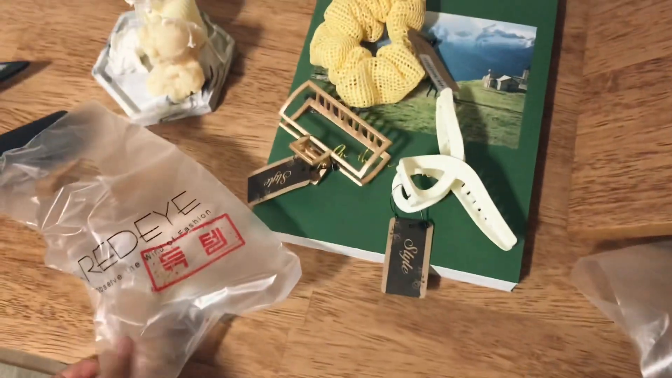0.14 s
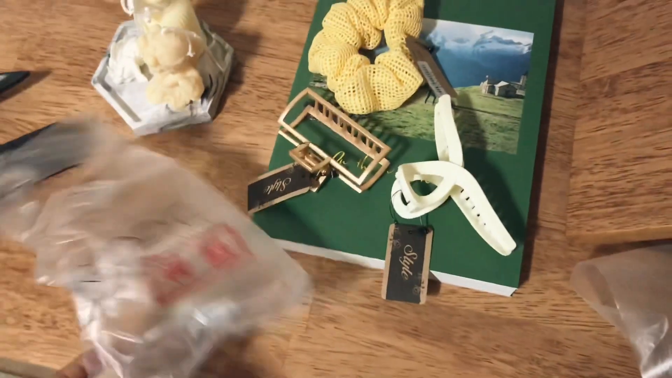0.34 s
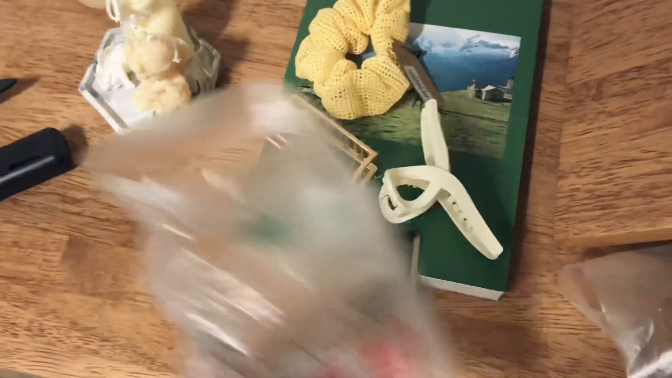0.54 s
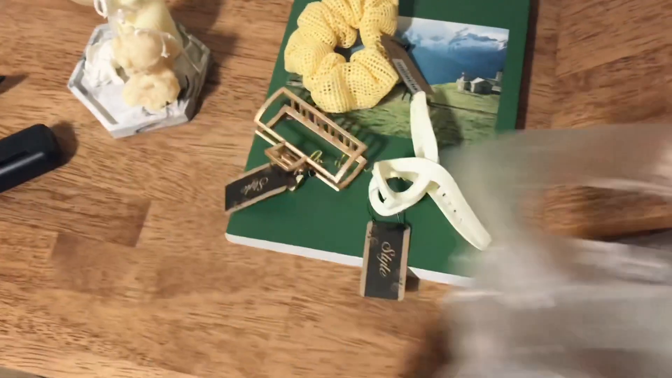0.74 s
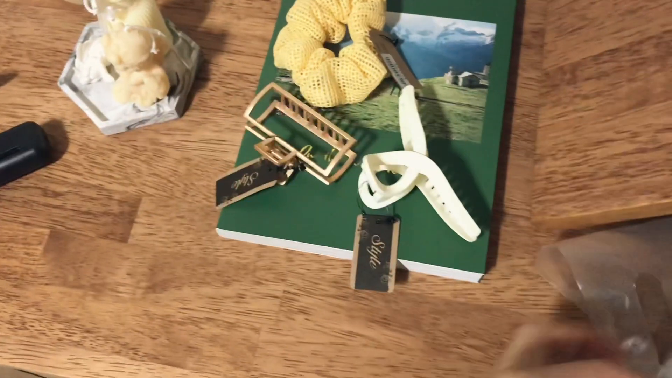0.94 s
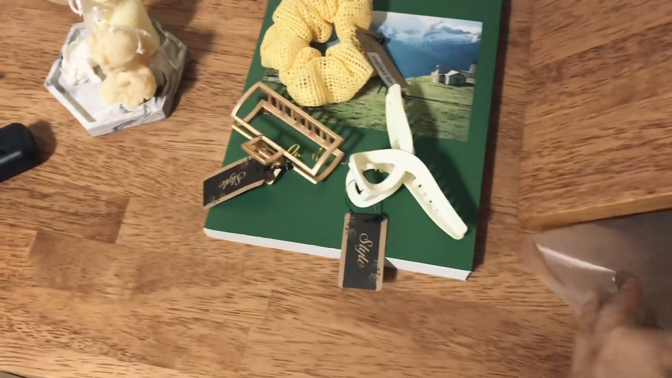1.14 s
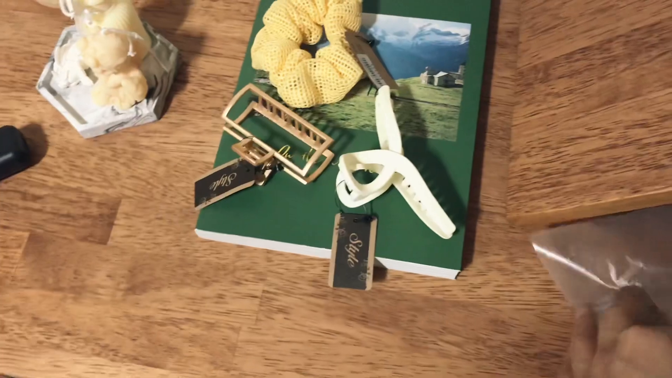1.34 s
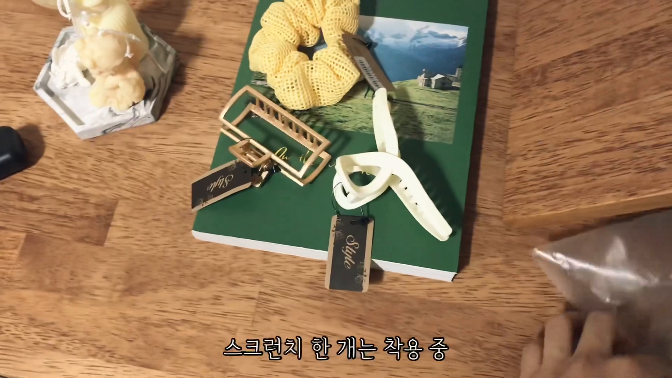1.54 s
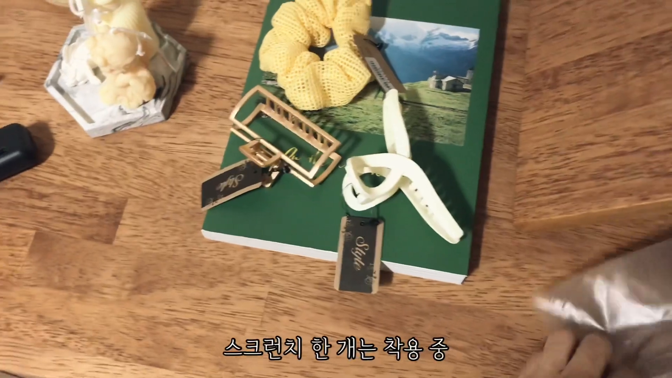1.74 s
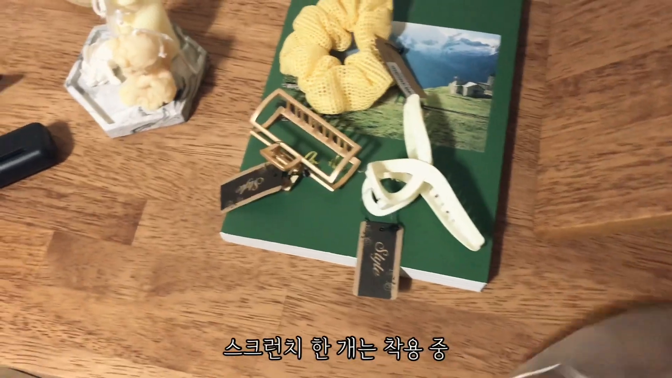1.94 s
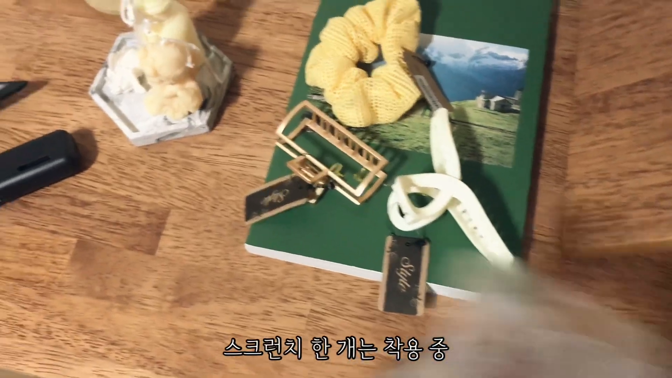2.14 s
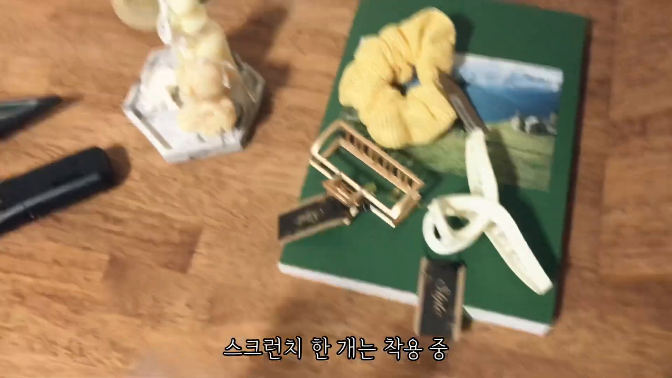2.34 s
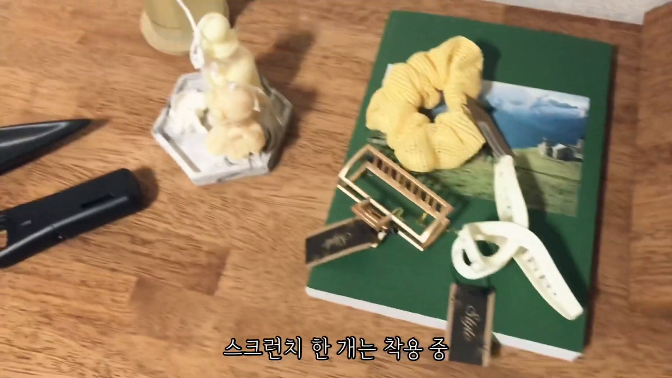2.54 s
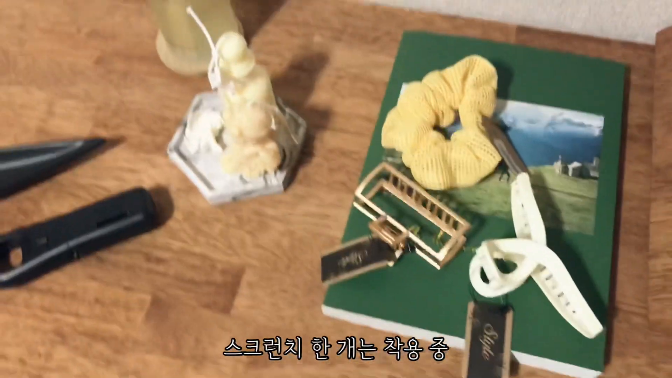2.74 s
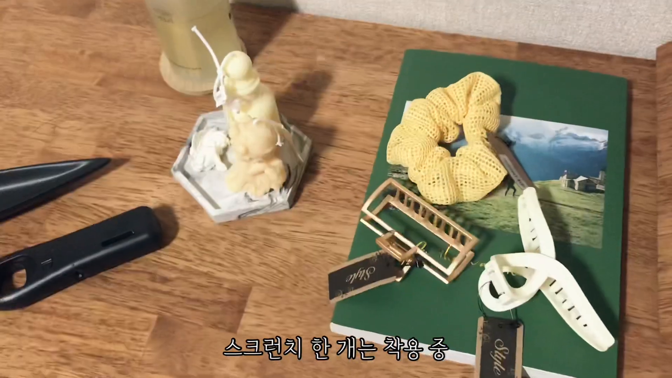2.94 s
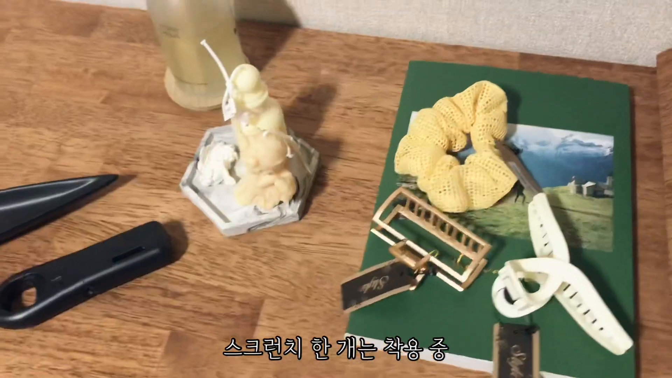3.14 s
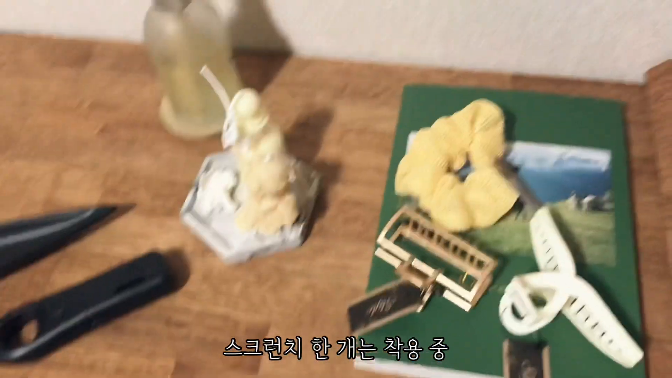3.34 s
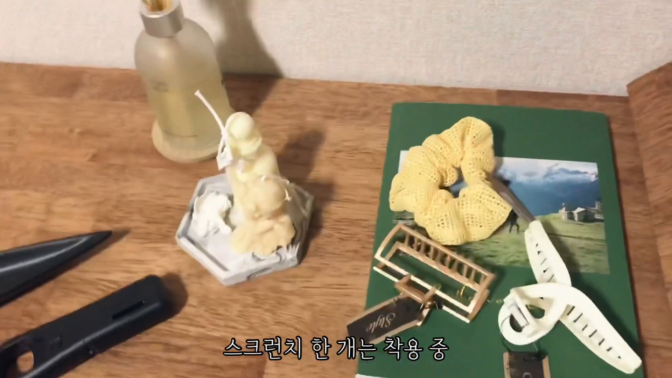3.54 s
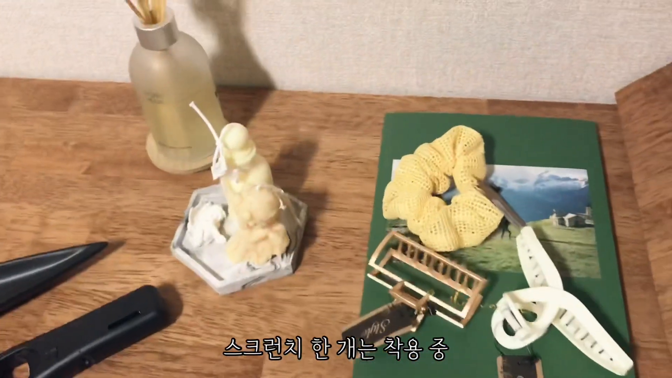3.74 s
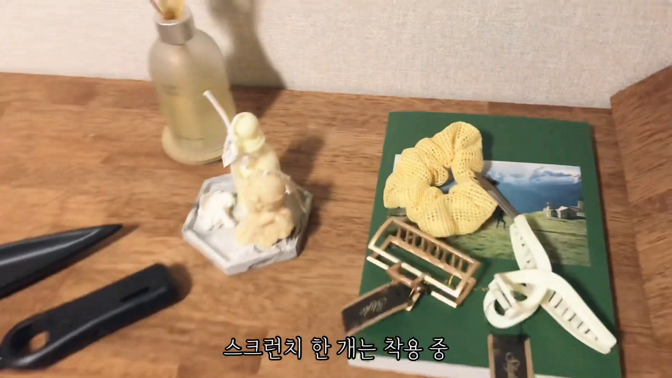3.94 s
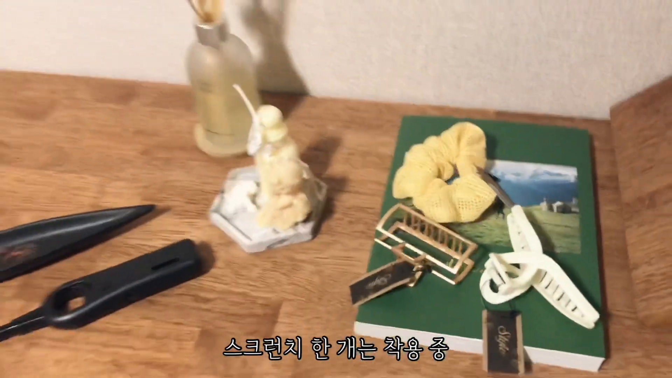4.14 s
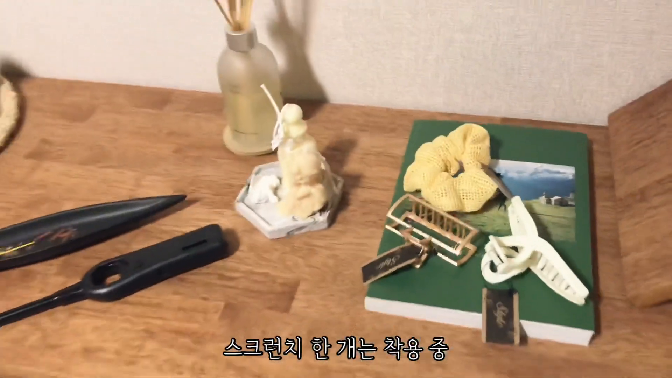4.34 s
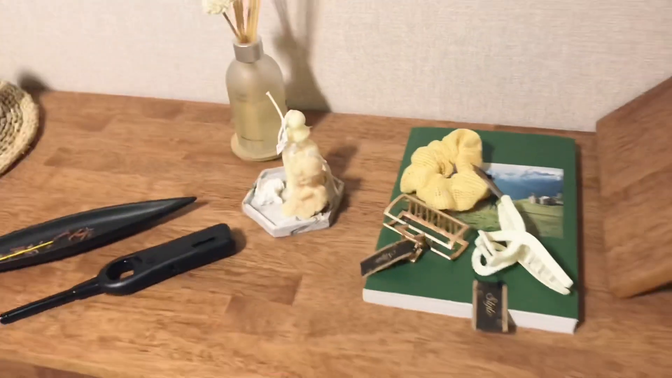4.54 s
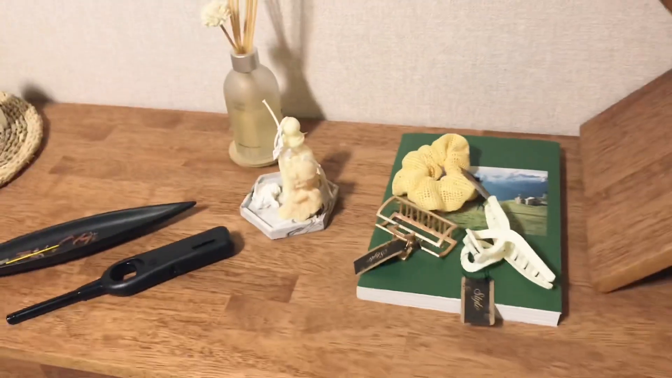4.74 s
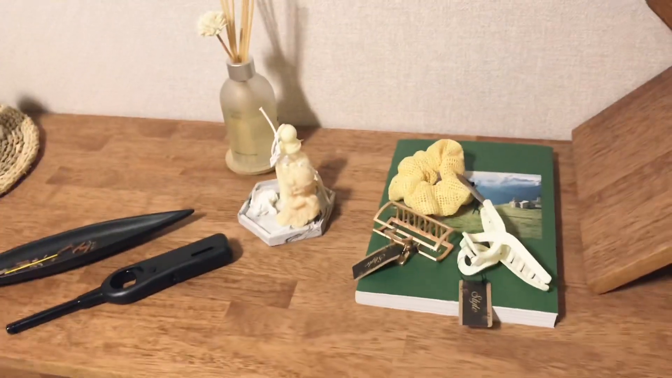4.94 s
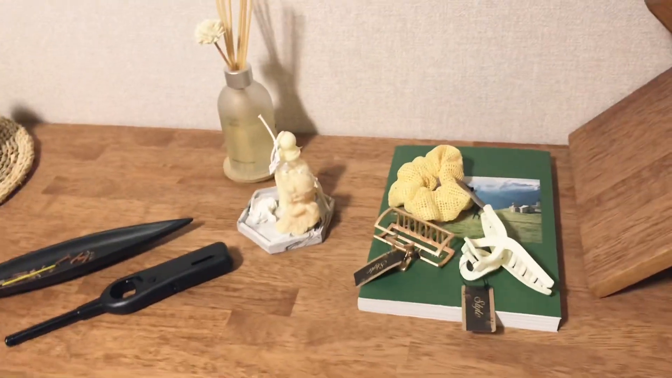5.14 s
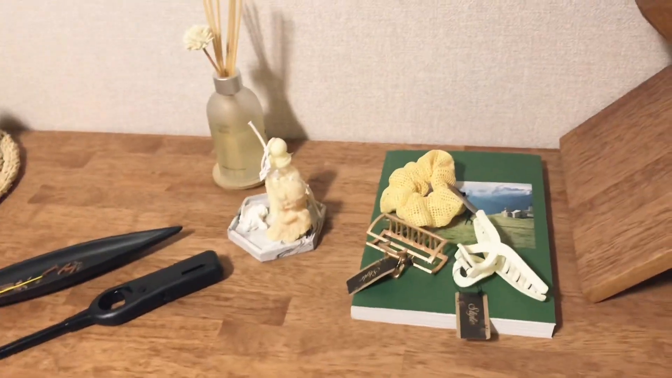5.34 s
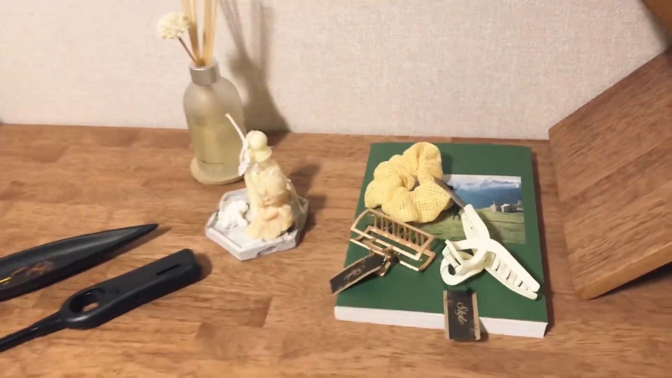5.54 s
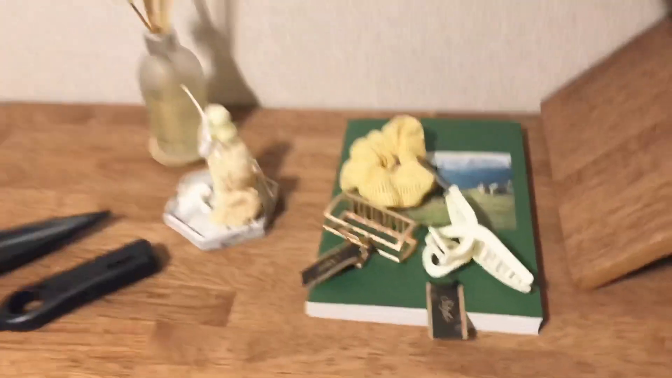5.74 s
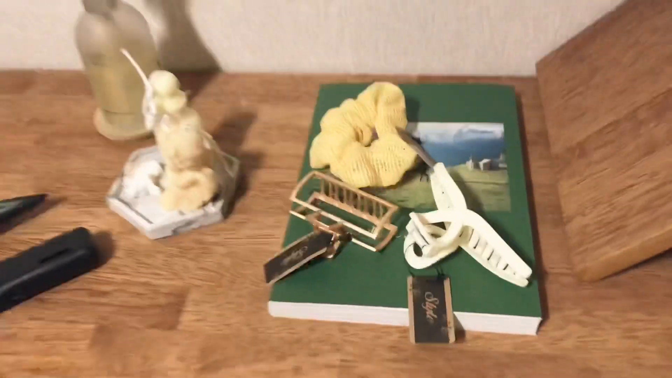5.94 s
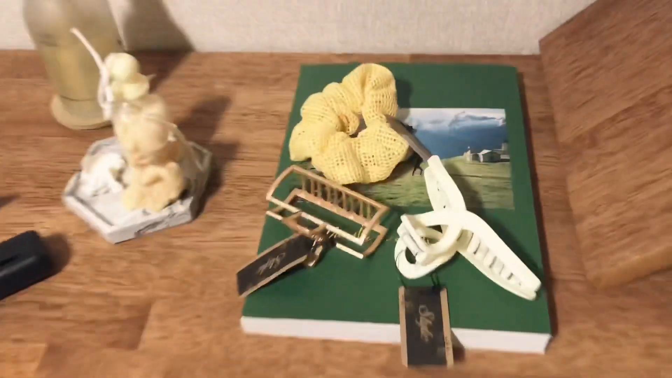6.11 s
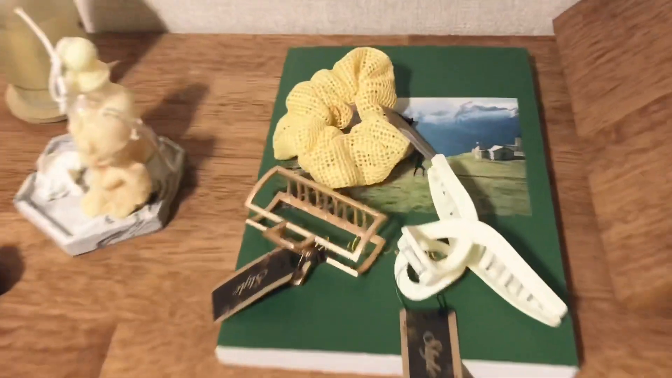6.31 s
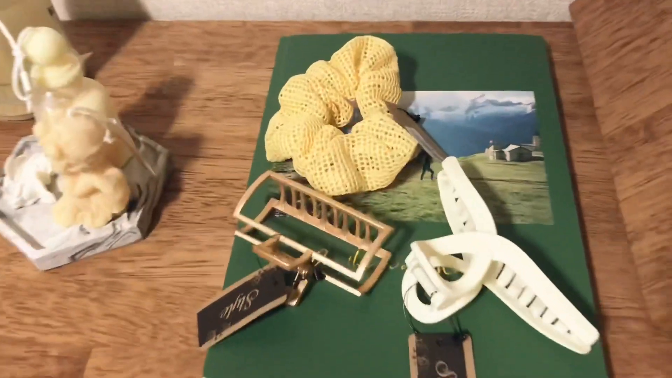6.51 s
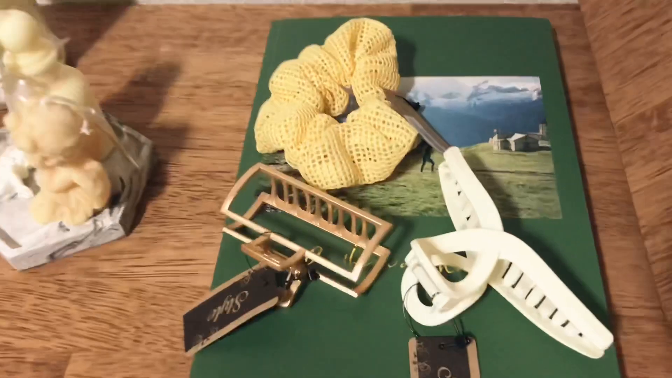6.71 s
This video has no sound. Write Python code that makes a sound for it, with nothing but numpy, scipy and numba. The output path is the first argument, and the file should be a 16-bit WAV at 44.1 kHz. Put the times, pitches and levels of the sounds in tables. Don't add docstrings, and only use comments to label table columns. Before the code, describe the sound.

Close to a hand-held phone at a wooden desk, thin plastic bags crinkle lightly with sharp snaps, then are gathered and crushed in a dense, bright, crackling burst with soft low thuds. The rustle drops after about three seconds into sparse crackles and small slides, leaving a small quiet room with faint hum, hiss and a distant insect-like high band.

```python
import sys
import numpy as np
from scipy import signal
from scipy.fft import rfft, irfft, next_fast_len
from scipy.io import wavfile
from scipy.ndimage import uniform_filter1d
from numba import njit

SR = 44100
rng = np.random.default_rng(int(sys.argv[2]) if len(sys.argv) > 2 else 0)


def int16_out(signal):
    q = np.round(np.clip(np.atleast_2d(signal).T, -1, 1) * 32767)
    wavfile.write(sys.argv[1], SR, q.astype(np.int16))


def to_linear_factor(level_db):
    exponent = np.asarray(level_db, float) / 20
    return 10 ** exponent


N = 298557

PANEL_EDGES_HZ = (300, 1800, 7000, 16500)


def level(x, db):
    return x * to_linear_factor(db) / np.sqrt(np.mean(x ** 2))


def shape_db(points, hz):
    f, db = np.transpose(points)
    return np.interp(np.log(np.maximum(hz, 1)), np.log(f), db)


def coloured(points):
    size = next_fast_len(N)
    gain = to_linear_factor(shape_db(points, np.fft.rfftfreq(size, 1 / SR)))
    spectrum = rfft(rng.standard_normal(size)) * gain
    return level(irfft(spectrum, size)[:N], 0)


def walk(rate_hz):
    hold = int(SR / rate_hz)
    steps = np.repeat(rng.standard_normal(N // hold + 1), hold)
    return 2.0 * uniform_filter1d(uniform_filter1d(steps, hold), hold)[:N]


@njit
def ring(start_s, hz, t60_s, gain, turn):
    out = np.zeros(N)
    for k in range(len(start_s)):
        step = np.exp(2j * np.pi * hz[k] / SR - np.log(1000.) / (t60_s[k] * SR))
        z = gain[k] * np.exp(2j * np.pi * turn[k])
        first = int(start_s[k] * SR)
        for i in range(first, min(N, first + int(t60_s[k] * SR))):
            out[i] += z.imag
            z *= step
    return out


def panels(s, db, lo_hz, hi_hz, run_s, cycles, scatter_db, count):
    c = rng.random((len(s), count, 5))
    place = (np.arange(count) + c[..., 0]) / count
    hz = lo_hz[:, None] * (hi_hz / lo_hz)[:, None] ** place
    late = c[..., 1] ** 1.7
    turn = .5 * (c[..., 4] > .5) + .08 * c[..., 2]
    t60_s = np.clip(cycles * (.5 + c[..., 2]) / hz, .0004, .03)
    stiff_db = 7 * (place - .5)
    gain = to_linear_factor(db[:, None] - 12.6 * late + stiff_db + scatter_db * (c[..., 3] - 1.0))
    start_s = s[:, None] + run_s[:, None] * late / 2
    return ring(start_s.ravel(), hz.ravel(), t60_s.ravel(), gain.ravel(), turn.ravel())


def quiet():
    # freq_hz, level_db_per_hz
    room_spectrum = [(28, -30.5), (42, 0.5), (58, 3), (90, -13.5), (137, -8.5), (250, -14), (500, -18),
                     (1000, -23), (2000, -29.5), (4000, -28.5), (6500, -34.5), (10300, -35.5), (12500, -35),
                     (16000, -42)]
    # centre_hz, width_hz, level_db
    insect_bands = [
        (4650, 230, -75),
        (4820, 230, -75.5),
        (4960, 280, -75.5),
    ]
    out = to_linear_factor(-64 + 0.69 * walk(1.94)) * coloured(room_spectrum)
    for hz, width_hz, db in insect_bands:
        b, a = signal.iirpeak(hz, hz / width_hz, fs=SR)
        band = signal.lfilter(b, a, signal.lfilter(b, a, rng.standard_normal(N)))
        out = out + level(band, db) * to_linear_factor(0.7 * walk(9.8))
    return out


def hands():
    # time_s, grip_rustle_db, tension_db
    grip_points = [(0, -81, -11), (.3, -67, 5.5), (.8, -70, 3.5), (.95, -59, -1.5), (1.22, -56.5, -1.5),
                   (1.33, -46.5, -4), (1.75, -45, -4), (2.1, -48, -3), (2.45, -46, 1), (2.6, -50.5, -0.5),
                   (3.08, -46, -1), (3.2, -59, -2), (3.45, -74.5, 4.5), (3.75, -70.5, -10),
                   (4.0, -61, -1.5), (4.45, -63.5, -13), (4.55, -75.5, -3), (6.77, -86, 0)]
    # start_s, hold_s, above_grip_db, slackening_db
    squeezes = [(0.156, 0.071, 6.5, 5), (0.57, 0.23, 3.5, 6.5), (0.94, 0.054, 4, 0),
                (1.138, 0.041, 5.5, -1), (1.323, 0.078, 3, -1), (1.49, 0.17, 3, -2),
                (1.88, 0.095, 4.5, -1.5), (2.112, 0.034, 3, 2), (2.175, 0.17, 8.5, 0.5),
                (2.38, 0.052, 5.5, -1.5), (2.493, 0.049, 6.5, -0.5), (2.65, 0.052, -1.5, 2),
                (2.832, 0.16, 1.5, -1.5), (3.602, 0.11, 3, 4), (3.852, 0.12, -0.5, 3), (5.14, 0.078, 2, 5),
                (5.257, 0.053, 2.5, 2), (1.814, 0.012, -7, 0)]
    close_s = 0.026
    t = np.arange(N) / SR
    s, grip_db, tension_db = np.transpose(grip_points)
    grip_db, tension_db = np.interp(t, s, grip_db), np.interp(t, s, tension_db)
    slack_db = 0
    for s, hold_s, db, give_db in squeezes:
        closed = np.clip(np.minimum(t - s, s + hold_s - t) / close_s + 1, 0, 1)
        grip_db = grip_db + db * closed
        slack_db = slack_db + give_db * closed
    force_db = grip_db + 45
    fade_db_per_s, from_s, to_s = 11.5, 2.19, 3.08
    lifted_db = fade_db_per_s * (t - from_s).clip(0) * np.clip((to_s - t) / 0.5 + 1, 0, 1)
    sheen_db = -47 + force_db + tension_db - slack_db / 2
    body_db = -51.5 + 0.79 * force_db - 0.36 * tension_db + slack_db
    bump_db = -51 + 0.77 * force_db + 0.55 * slack_db - lifted_db
    return grip_db, sheen_db, body_db, bump_db


def film(size_db, slide_db, count):
    # freq_hz, level_db_per_hz
    film_spectrum = [(120, -29), (200, -4), (633, -6), (777, -10.5), (989, -3), (1970, -6), (4370, 3),
                     (6340, -1), (14900, -5.5), (16100, -62.5), (17000, -37.5)]
    c = rng.random((count, 4))
    centre_hz = 300 * 55 ** c[:, 1]
    db = shape_db(film_spectrum, centre_hz) + 10 * np.log10(centre_hz / 3000)
    db = db - size_db * np.log(c[:, 2] + .012)
    top_hz = np.minimum(centre_hz * 1.402, PANEL_EDGES_HZ[-1])
    run_s = .008 + .016 * c[:, 3]
    grains = panels(c[:, 0] * N / SR, db, centre_hz / 1.4, top_hz, run_s, cycles=10, scatter_db=6, count=13)
    sheet = level(grains, 0) + to_linear_factor(slide_db + 2.0 * walk(40)) * coloured(film_spectrum)
    bands = []
    for k in range(3):
        sos = signal.butter(3, PANEL_EDGES_HZ[k:k + 2], "bandpass", fs=SR, output="sos")
        bands.append(level(signal.sosfilt(sos, sheet), 0))
    return np.array(bands)


def rubs(count):
    # start_s, length_s, level_db, from_hz, to_hz
    desk_rubs = [(0.103, 0.33, -67, 230, 299), (.92, 0.14, -59, 220, 240), (0.959, 0.28, -60, 620, 650),
                 (1.32, 0.39, -52.5, 640, 620), (1.499, .2, -46, 4500, 3700), (2.1, .3, -48, 600, 620),
                 (1.882, 0.089, -51.5, 1700, 1500), (2.772, 0.13, -52.5, 1070, 1130),
                 (2.9, .23, -56, 1110, 950), (3.92, .07, -62, 1200, 1400), (4.041, 0.043, -57.5, 334, 660),
                 (4.165, 0.04, -50, 370, 365), (4.171, 0.06, -56, 1400, 1200),
                 (4.309, 0.084, -58.5, 1050, 1200), (4.31, 0.055, -52, 3400, 3400),
                 (4.364, 0.037, -51.5, 2700, 2500), (5.108, 0.093, -68, 796, 1100),
                 (5.2, 0.14, -68, 1090, 1400), (5.855, 0.043, -71, 450, 450), (6.199, .12, -68, 230, 652)]
    # start_s, length_s, level_db, from_hz, to_hz
    phone_shifts = [
        (3.562, .14, -59.5, 58, 58),
        (3.882, .15, -63, 62, 62),
        (5.103, 0.33, -66, 55, 55),
        (6.297, 0.37, -64, 54, 54),
        (1.38, .14, -57, 60, 60),
        (4.7, 0.23, -68, 55, 55),
    ]
    s, length_s, db, from_hz, to_hz = np.transpose(desk_rubs + phone_shifts)[..., None]
    c = rng.random((5, len(s), count))
    span, ring_cycles = 1.177, 9
    hz = from_hz * (to_hz / from_hz) ** c[0] * span ** (2 * c[1] - 1)
    t60_s = ring_cycles * (.5 + c[2]) / hz
    overlap = count * t60_s / length_s / 14
    swell = np.sqrt(np.sin(np.pi * c[0]) / overlap)
    gain = to_linear_factor(db - 2.8 * np.log(c[3] + 0.023)) * swell
    start_s = s + length_s * c[0]
    turn = c[4].ravel() // .5 / 2
    return ring(start_s.ravel(), hz.ravel(), t60_s.ravel(), gain.ravel(), turn)


def pops():
    # start_s, strength_db, panel_hz
    panel_pops = [(0.151, -48.5, 866), (0.151, -45, 2180), (0.163, -45, 5500), (0.206, -50, 6850),
                  (0.602, -40, 8450), (0.629, -45, 3450), (0.714, -44, 1100), (0.881, -46, 540),
                  (0.908, -31, 6800), (0.909, -39, 3450), (1.118, -41.5, 4320), (1.165, -41.5, 2170),
                  (1.22, -33, 5500), (1.291, -34.5, 8610), (1.34, -39, 10820), (1.341, -39, 3270),
                  (1.446, -41, 2180), (1.469, -38, 690), (1.473, -37, 1890), (1.473, -36, 5450),
                  (1.526, -32.5, 4270), (1.549, -42, 4330), (1.601, -38, 3760), (1.607, -42, 1380),
                  (1.618, -39, 3450), (1.637, -36, 8600), (1.691, -38, 3760), (1.712, -44, 544),
                  (1.777, -40, 4320), (1.826, -40, 1080), (1.852, -42, 1060), (1.878, -34, 4320),
                  (1.898, -36, 1730),
                  (1.941, -35, 866), (1.941, -29.5, 4370), (1.98, -38.5, 8640), (1.996, -33, 8700),
                    (2.043, -32, 5450), (2.128, -42, 2740), (2.156, -39.5, 1380), (2.167, -23.5, 4350),
                    (2.207, -29, 4330), (2.213, -31, 4320), (2.223, -32, 8610), (2.244, -28.5, 5450),
                    (2.246, -37, 2180), (2.252, -31, 4960), (2.271, -40, 1080), (2.298, -37.5, 1080),
                    (2.325, -35.5, 5500), (2.334, -33.5, 6800), (2.385, -34.5, 5450), (2.396, -36, 8610),
                    (2.421, -38, 11400), (2.422, -38, 6850), (2.489, -37, 5450), (2.523, -43, 2180),
                    (2.55, -36, 3800), (2.551, -42.5, 553), (2.643, -44, 6850), (2.671, -30.5, 5500),
                  (2.786, -45, 1100), (2.827, -39, 13600), (2.839, -42, 2730), (2.84, -44, 6540),
                    (2.907, -34, 2760), (2.908, -38, 6540), (2.925, -41.5, 1120), (2.965, -46, 1100),
                    (3.007, -45, 6850), (3.007, -46, 2700), (3.037, -43, 2740), (3.05, -47, 13600),
                    (3.065, -47, 5450), (3.071, -47, 550), (3.093, -44, 2740), (3.13, -43, 6850),
                    (3.157, -49, 2740), (3.589, -49, 4330), (3.609, -52, 1090), (3.822, -53, 1100),
                    (3.823, -58, 2740), (3.846, -57.5, 2740), (3.953, -50, 1380), (4.061, -52, 2700),
                    (4.197, -52, 3270), (4.373, -46, 2740), (5.212, -59.5, 1100)]
    s, db, hz = np.transpose(panel_pops)
    kick_db = db + 10.5 + 10 * np.log10(np.maximum(hz, 600) / 4000)
    lag_s, run_s, span = .0013, .005, 1.18
    top_hz = np.minimum(hz * span, PANEL_EDGES_HZ[-1])
    return panels(s + lag_s, kick_db, hz / span, top_hz, run_s + 0 * s, cycles=15, scatter_db=6.5, count=10)


def snaps():
    # start_s, strength_db, tightness_db, run_ms
    crisp_creases = [(.152, -28, -1.5, 9), (.2153, -33, -4, 5.4), (.3484, -22, 14, 6.25),
                     (.3728, -35, -3, 5.6), (.4566, -40, -27, 14.6), (.5135, -35.5, -18, 11),
                     (.6402, -18, 18, 5.2), (.7127, -27.5, -2, 10.8), (.748, -21.5, -1.5, 10.8),
                     (.8702, -32, -14, 11), (.8734, -26.5, -16, 19), (.9091, -36, -8, 19),
                     (.9245, -23, -1.5, 14), (1.0374, -34.5, -12, 10.6), (1.0802, -27.5, -4.5, 13),
                     (1.1198, -26.5, -2, 10.4), (1.2194, -29, -2, 11), (1.2218, -17, -4.5, 3.06),
                     (1.2301, -21.5, 5, 10), (1.2924, -23, 1.5, 14), (1.4899, -21, -6.5, 12),
                     (1.5271, -18.5, -13, 6.6), (1.5515, -24.5, 0, 6.4), (1.5595, -22.5, -1, 6),
                     (1.5685, -27, -2, 12), (1.5924, -21, -15, 4.2), (1.6085, -27, -1, 14),
                     (1.6448, -29, -4, 21), (1.6715, -22.5, -5, 4.7),
                     (1.7855, -19.5, -12, 12), (1.845, -26, -0.5, 8.1), (1.869, -23, -11, 5.5),
                     (1.878, -23, -7, 8.1), (2.044, -29, 12, 5.2), (2.1023, -24.5, -13.5, 7.4),
                     (2.1562, -25, 3.5, 7), (2.1777, -11.5, 4.5, 10.3), (2.2085, -12.5, 7.5, 3),
                     (2.2156, -18, -5, 7.5), (2.234, -12, -6, 4.6), (2.2463, -17, 1, 12),
                     (2.265, -20, -1, 25), (2.3557, -15.5, -1, 11), (2.4127, -17.5, -6, 18),
                     (2.4737, -18, -3.5, 11), (2.5039, -21.5, -6.5, 16), (2.552, -20, -7, 4.5),
                     (2.6436, -38, -0.5, 3), (2.7869, -29, -5, 13), (2.8389, -30.5, 2, 20),
                     (2.9091, -19, -3.5, 3.9), (3.0079, -23.5, -20, 2.8), (3.037, -27.5, -21, 22)]
    # start_s, strength_db, tightness_db, run_ms
    crisp_resting = [(3.1841, -30.5, -7, 24), (3.2393, -30.5, -18, 6.4), (3.2814, -32.5, -18, 10),
                     (3.3515, -47, -1, 3), (3.3561, -49, 5, 5.4), (3.3763, -27.5, 8, 7.8),
                     (3.5297, -46, -18, 12), (3.5904, -37.5, -18, 8.4), (3.7874, -41.5, -21, 19),
                     (3.9692, -30.5, 19, 3.5), (4.5675, -36.5, -11, 5.5), (5.1164, -44, -19, 7.2),
                     (5.4315, -45.5, -22, 7.3), (3.2933, -36, -11, 19), (3.5536, -42, 0, 4.8),
                     (3.6087, -37, -18, 8), (3.8052, -50, -7, 10), (3.823, -48, -21, 5.9),
                     (3.846, -49, -28, 6.6), (3.919, -41.5, -13, 10.4), (4.128, -41.5, -7, 11),
                     (4.45, -44, -17, 9.1), (3.9529, -41.5, -8, 11), (4.3206, -39, 9, 8.9),
                     (4.4115, -31.5, -11, 3.1), (5.2114, -47, -18, 6.9), (5.5668, -41, -16, 6.8),
                     (6.1095, -47, -5, 15)]
    # start_s, strength_db, tightness_db, run_ms
    broad_folds = [(.1641, -36, -6, 10), (.2062, -43, 8, 5), (.2515, -37.5, -11, 5.4),
                   (.537, -25, 0.5, 20), (.6045, -29.5, -13, 4.7), (.6287, -46, -22, 17),
                   (.664, -34.5, -20, 11), (.7163, -35, 3, 3.4), (.7451, -25.5, 0, 14),
                   (.8434, -34, -19, 16), (.9725, -32, -17, 8.2), (1.0066, -30.5, -7, 11.3),
                   (1.0856, -28.5, 8, 5.3), (1.1661, -21.5, 13, 7.6), (1.3155, -25.5, -17, 15),
                   (1.3352, -26, -9, 6.3), (1.3493, -26, -3.5, 14.4), (1.4449, -27.5, -2.5, 10.4),
                   (1.4743, -19, -9, 8.7), (1.6014, -27, 1, 12.6), (1.7765, -26, -11.5, 20),
                   (1.8258, -19.5, -11, 6.8),
                   (1.8521, -17, -7.5, 11.3), (1.903, -19.5, -2.5, 4.4), (1.9407, -19.5, 0.5, 9.3),
                     (1.9673, -17.5, -3.5, 13.2), (1.9973, -16.5, -4, 22.5), (2.0978, -25, -5, 8.8),
                     (2.1066, -19.5, -15, 10), (2.13, -29, -14, 8.3), (2.168, -12, -3, 4.9),
                     (2.2233, -16, -18, 10), (2.2691, -18, 13, 11.7), (2.299, -18, -6, 13),
                     (2.3333, -21.5, -4, 15.3), (2.3844, -26, -1, 6.2), (2.6195, -26.5, -4, 11),
                     (2.671, -17.5, 6, 13), (2.761, -29.5, 3, 9.5), (2.806, -32.5, -1, 13),
                     (2.9265, -24.5, -4.5, 17), (2.9674, -30, 7, 18), (3.066, -33.5, -7, 6.9),
                     (3.094, -37, -17, 10)]
    kinds = [(crisp_creases, -30.5), (crisp_resting, -19), (broad_folds, -13)]
    creases = [(*row, wide) for rows, wide in kinds for row in rows]
    s, db, tightness_db, run_ms, fold_db = np.transpose(creases)
    middle_db = db - np.maximum(tightness_db, 0)
    tight_db = db + np.minimum(tightness_db, 0)
    wide_db = middle_db + fold_db
    low, mid, high, top = (edge + 0 * s for edge in PANEL_EDGES_HZ)
    run = run_ms / 1000
    wide = panels(s, wide_db - 8.5, 1.72 * low, mid, run, cycles=4.4, scatter_db=-11.5, count=12)
    middle = panels(s, middle_db - 8.5, 1.384 * mid, high, run, cycles=21.2, scatter_db=12.5, count=40)
    tight = panels(s, tight_db + 1.5, high, top, 0.81 * run, cycles=11.4, scatter_db=10.5, count=50)
    after = panels(s, middle_db - 15.0, 0.861 * mid, high, 0.024 + 0 * run,
                   cycles=28.7, scatter_db=24.0, count=60)
    after_tight = panels(s, tight_db - 16.5, high, top, 0.029 + 0 * run, cycles=25, scatter_db=2.0, count=80)
    thin = signal.butter(2, 650, "highpass", fs=SR, output="sos")
    return signal.sosfilt(thin, wide + middle + tight + after + after_tight)


def slides():
    # peak_s, strength_db, tightness_db, t60_ms
    slide_rows = [(.159, -44.5, 1, 100), (0.878, -47.5, 2, 130), (3.291, -55.5, -13, 130),
                  (3.397, -58, 9, 220), (3.559, -58, 4, 350), (3.614, -51, 2, 190), (3.809, -60, -0.5, 320),
                  (3.972, -56, 14, 150), (4.06, -59, -14, 66), (4.18, -44, -0.5, 170), (4.324, -50, 4, 380),
                  (4.375, -54, 1, 95), (4.579, -56.5, 5, 320), (4.607, -52, 0, 220), (4.64, -54, 1, 190),
                  (4.83, -67, 1.5, 530), (5.125, -61, -4, 180), (5.218, -61, 0, 230),
                  (5.44, -61.5, -6, 170), (5.573, -54, 0.5, 250), (5.859, -63.5, -6, 160),
                  (6.112, -55.5, 2, 180)]
    t, power = np.arange(N) / SR, np.zeros((3, N))
    for s, db, tightness_db, t60_ms in slide_rows:
        rise_ms = 14 + 0.62 * max(db + 60, 0)
        band_db = db + np.array([-7 - tightness_db, 0, -5 + tightness_db])
        rise_db = -20 * ((s - t) * 1000 / rise_ms)
        fade_db = -60 * (t - s) * 1000 / t60_ms
        swell = to_linear_factor(np.where(t < s, rise_db, fade_db).clip(-120))
        power += (to_linear_factor(band_db[:, None]) * swell) ** 2
    return np.sqrt(power)


def rustle(body_db, rustle_db, sheen_db):
    effort = np.clip((rustle_db + 62.0) / 14, 0, 1)
    rough = film(size_db=1.7, slide_db=-7, count=6500)
    smooth = film(size_db=1.5, slide_db=3, count=5000)
    held = to_linear_factor(np.array([body_db, rustle_db, sheen_db]) + 1.5 * walk(45))
    bands = held * (np.sqrt(effort) * rough + np.sqrt(1 - effort) * smooth)
    bands = bands + slides() * film(size_db=2.1, slide_db=-3, count=6000)
    return bands.sum(axis=0)


def ticks():
    # peak_s, peak_db, panel_hz
    tick_rows = [(.1642, -25, 7500), (0.6045, -23.5, 5900), (0.6288, -34, 3200), (.6403, -3, 13700),
                 (.7022, -47, 7000), (.7167, -24, 12000), (0.7455, -21, 11000), (.8966, -36, 3300),
                 (0.9257, -20.5, 7000), (.9563, -33, 7000), (.995, -36, 3300), (1.1905, -36, 7000),
                 (1.2193, -15, 11500), (1.252, -33, 5000), (1.2851, -34, 7000), (1.4878, -22, 4500),
                 (1.5515, -24, 3970), (1.562, -30, 3500), (1.609, -24, 11000), (1.7135, -34, 3500),
                 (1.9042, -16, 7500), (1.9814, -23.5, 8000), (2.0354, -32, 5000), (2.045, -18.5, 6030),
                 (2.0537, -30, 6990), (2.0876, -29, 3800), (2.1688, -12, 4500), (2.179, -11, 10000),
                 (2.3147, -27, 3500), (2.326, -25, 3800), (2.4058, -23, 9000), (2.4537, -28, 7000),
                 (2.5787, -34, 9000), (2.6589, -33, 6500), (2.9623, -30, 12000), (3.121, -31, 4500),
                 (3.2114, -39, 5000), (4.4117, -33.5, 4980)]
    s, db, hz = np.transpose(tick_rows)
    s = s - 1 / hz
    wider_hz = hz / 1.63
    ring_cycles = 8.4
    panel = ring(s, hz, ring_cycles / hz, to_linear_factor(db), 0 * s)
    return panel + ring(s, wider_hz, ring_cycles / wider_hz, to_linear_factor(db - 10), 0 * s)


def bumps(bump_db):
    # freq_hz, level_db_per_hz
    bump_spectrum = [(30, -29), (45, -9.5), (60, 1), (95, -7), (137, 3.5), (190, -1), (235, -2.5),
                     (340, -0.5), (450, -22.5)]
    # start_s, level_db, pitch_hz, t60_s
    knocks = [
        (.6038, -31, 880, .022),
        (.872, -52, 480, .03),
        (2.2215, -39, 90, .035),
        (2.2995, -31, 95, .055),
        (2.326, -39, 100, .04),
        (2.3815, -35, 70, .045),
        (2.668, -43, 400, .04),
        (3.283, -48, 400, .035),
        (4.058, -57, 350, .04),
        (4.18, -61, 380, .04),
    ]
    s, db, hz, t60_s = np.transpose(knocks)
    return to_linear_factor(bump_db + 1.8 * walk(23)) * coloured(bump_spectrum) + ring(s, hz, t60_s, to_linear_factor(db), 0 * s)


def room(x, tail_db, t60_s):
    t = np.arange(int(.4 * SR)) / SR
    noise = rng.standard_normal(len(t))
    dull = signal.lfilter([.4], [1, -.6], noise)
    bright_fade = to_linear_factor(-60 * t / (.5 * t60_s))
    walls = (dull * to_linear_factor(-60 * t / t60_s) + .5 * noise * bright_fade) * (t > .004)
    h = to_linear_factor(tail_db) * walls / np.linalg.norm(walls)
    h[0] += 1
    h[int(.0021 * SR)] += .2
    return signal.fftconvolve(x, h)[:N]


def scene():
    rustle_db, sheen_db, body_db, bump_db = hands()
    bags = rubs(count=80) + pops() + snaps() + ticks() + rustle(body_db, rustle_db, sheen_db)
    return (quiet() + room(bags, tail_db=-15.0, t60_s=0.17) + bumps(bump_db))[None]


def band_limit(x):
    return signal.sosfilt(signal.butter(12, 17130, fs=SR, output="sos"), x)


def record(dry):
    # centre_hz, width_hz, depth_0_to_1
    response_dips = [
        (10400, 1100, .36),
        (490, 110, .42),
    ]
    for hz, width_hz, depth in response_dips:
        dry = dry - depth * signal.lfilter(*signal.iirpeak(hz, hz / width_hz, fs=SR), dry)
    bass_cut = signal.butter(3, 40, "highpass", fs=SR, output="sos")
    shelf = signal.ellip(7, .3, 35, 15800, fs=SR, output="sos")
    heard = signal.sosfilt(np.vstack([bass_cut, shelf]), dry)
    return band_limit(heard)


dry = scene()
out = record(dry)
int16_out(out)
```